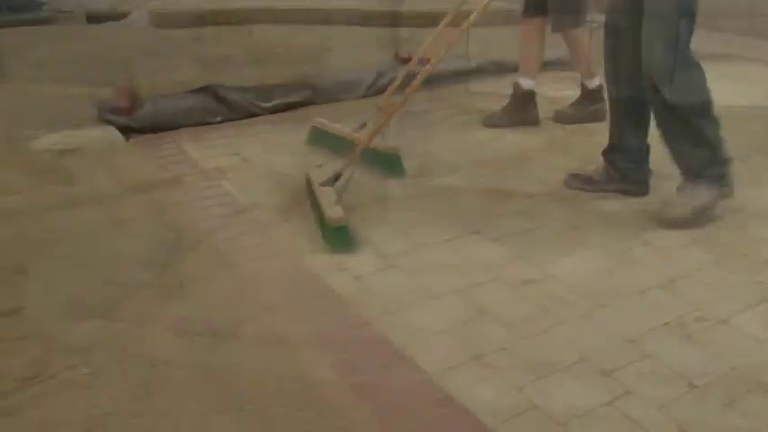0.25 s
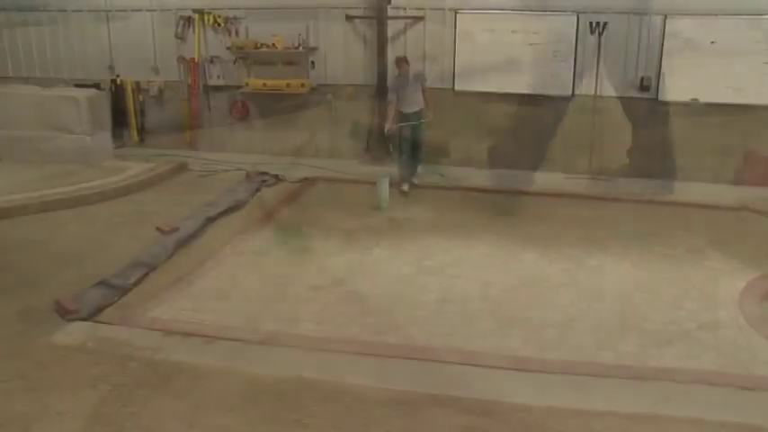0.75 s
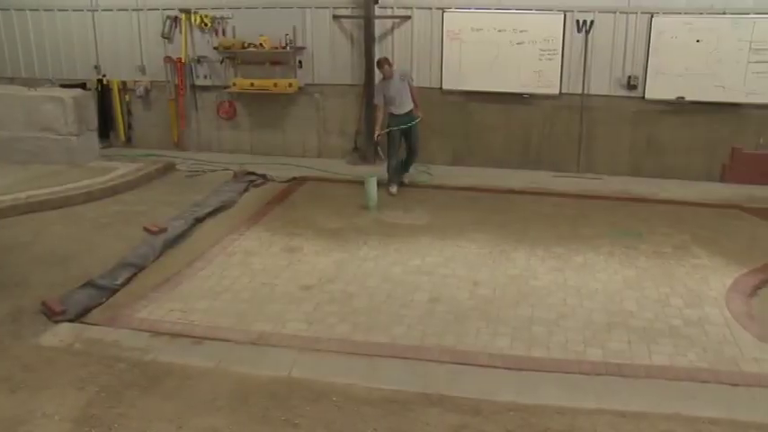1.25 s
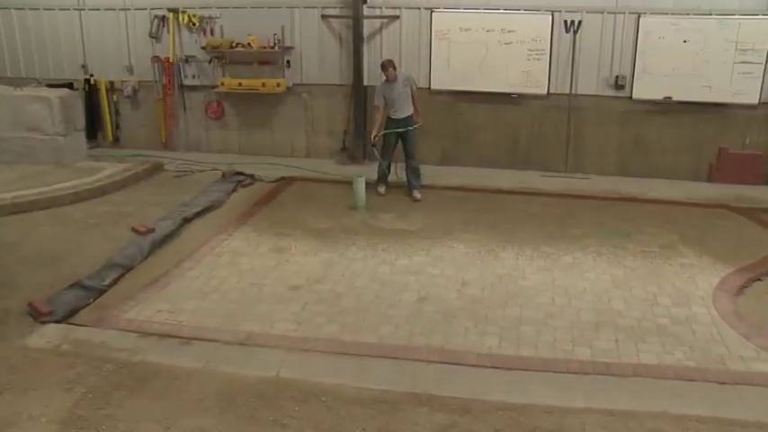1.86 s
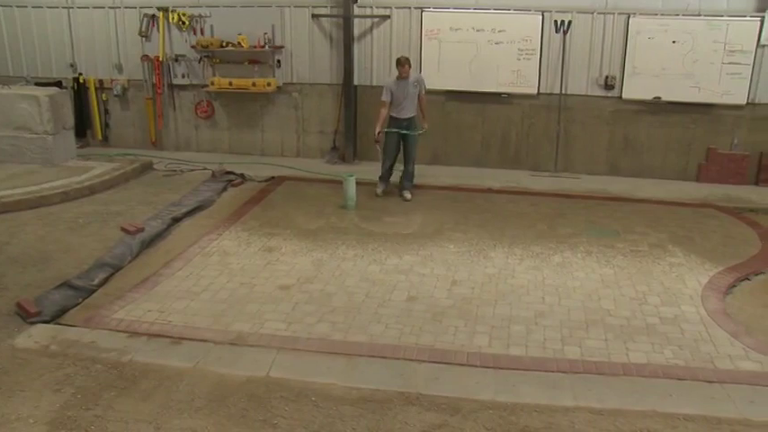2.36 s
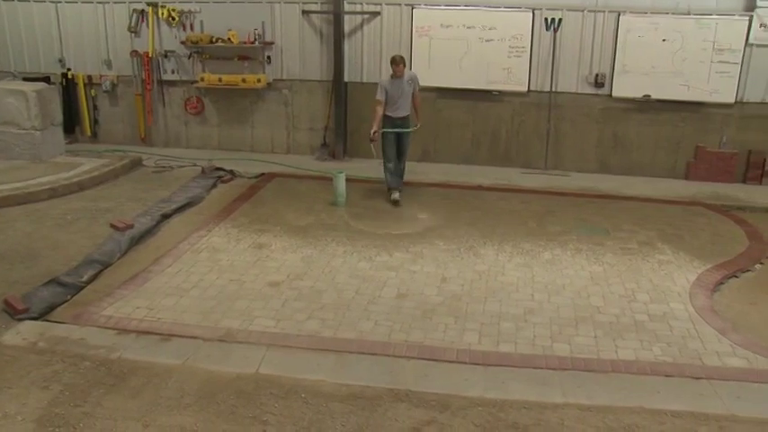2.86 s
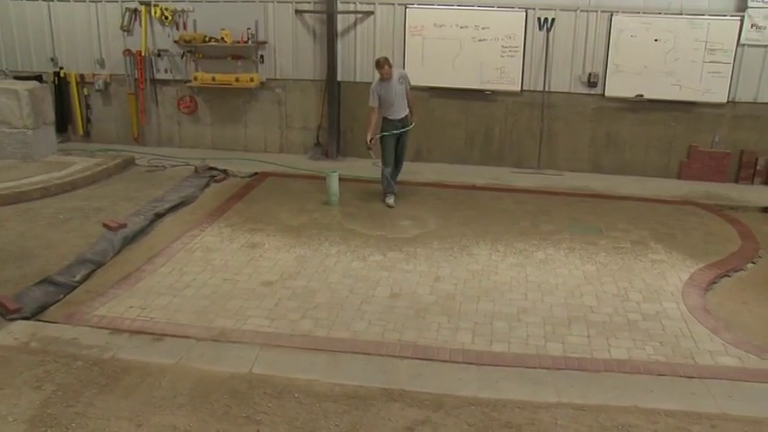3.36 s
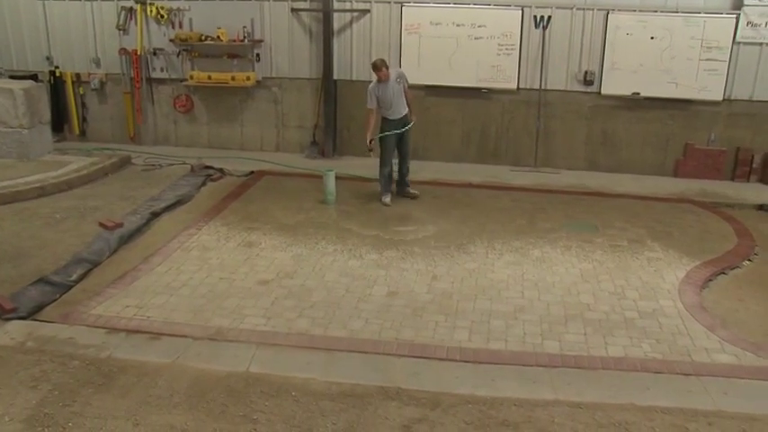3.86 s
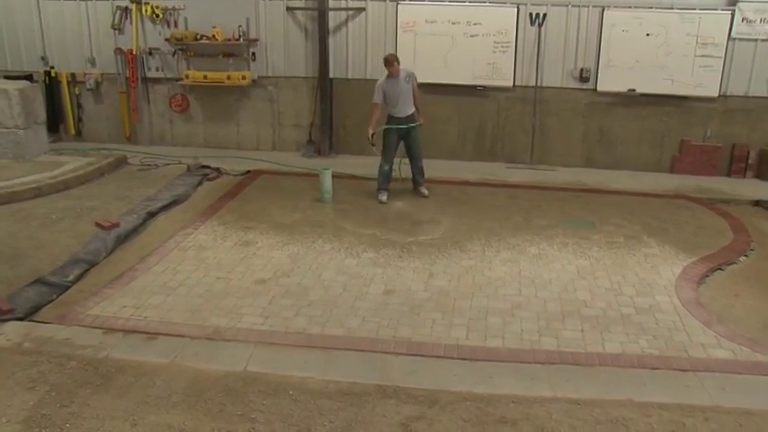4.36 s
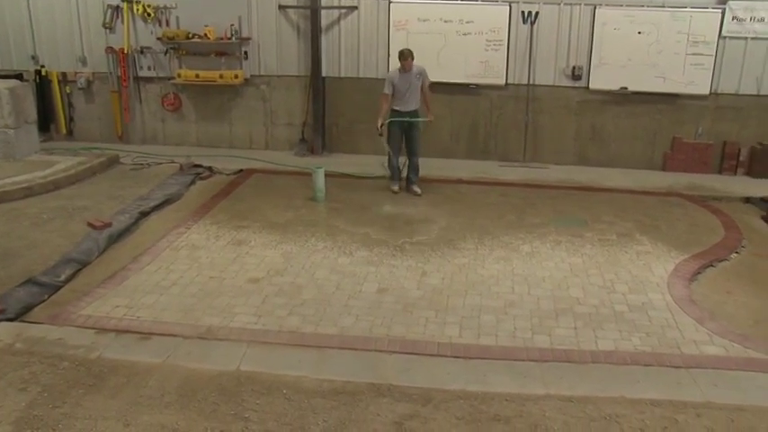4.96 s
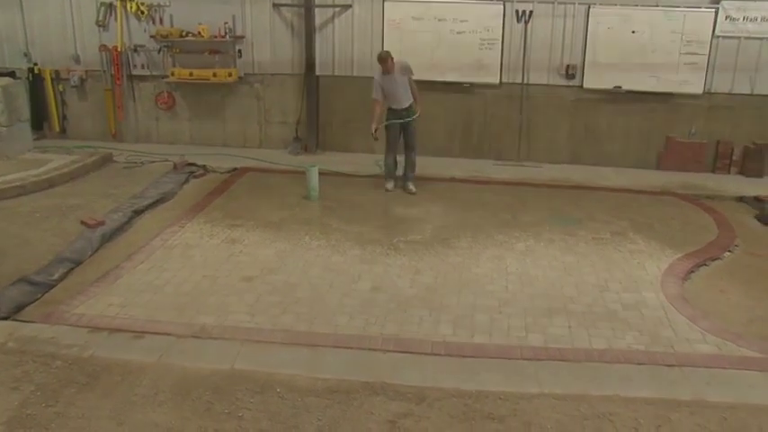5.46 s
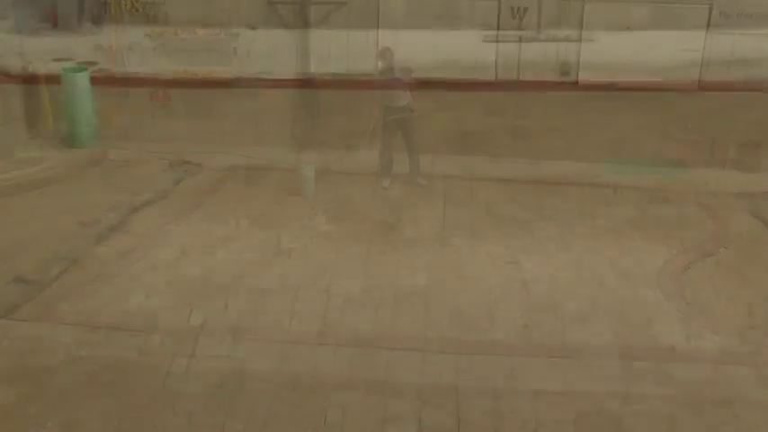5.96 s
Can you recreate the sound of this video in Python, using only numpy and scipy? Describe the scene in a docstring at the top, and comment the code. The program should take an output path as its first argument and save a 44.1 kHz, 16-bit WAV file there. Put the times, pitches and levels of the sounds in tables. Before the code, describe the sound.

Water spray hisses over sandy pavers indoors, dense and crisp like fine sizzling, fluttering with tiny lulls and a slow hollow phasing sweep. Sharp little splashes and soft pats dot it. A few muffled knocks and a bassy bump are heard through the first half; later a quick woody clatter rings briefly in the hall. Everything is centred, with faint low air rumble, rising in at first and fading out last.

```python
"""Hose spray on sanded paving

A hand-held hose patters on sanded paving in a large workshop hall. Random tiny impacts over noise
make a scratchy hiss; the swinging jet moves the comb notches of a ground echo, so its treble swirls.
Noise bursts make fat drops, damped sines wet pats, and swelling noise the scuffs of shoes. Filtered
pushes make dull knocks, a short clatter and a soft bump, over low ventilation noise.
"""
import sys
import numpy as np
from scipy import signal
from scipy.fft import rfft, irfft, next_fast_len
from scipy.io import wavfile
from scipy.ndimage import uniform_filter1d

SR = 44100
rng = np.random.default_rng(int(sys.argv[2]) if len(sys.argv) > 2 else 0)


def master_out(mix):
    """Clip the mix to full scale and print it as 16-bit PCM to the path in sys.argv[1]."""
    frames = np.transpose(np.atleast_2d(mix))
    ceiling = np.clip(frames, -1, 1)
    pcm = np.round(ceiling * 32767).astype(np.int16)
    wavfile.write(sys.argv[1], SR, pcm)


N = 273155
TOP_HZ = 15850  # upper edge of the sound


def spray(mist_db, hiss_db, splatter_db, gain_db):
    """Comb filtering: a jet's noise meets its own short ground echo, whose delay sets the notch spacing."""
    # spectrum of the patter: hz, level_db
    patter_colour = [(100, -14.5), (300, -15), (600, -10.5), (1200, -7.5), (2100, -9), (2900, -9.5),
                     (3800, -2.5), (5000, -0.5), (7000, 1.5), (9000, -2.5), (12000, -3), (14000, -6),
                     (15800, -12)]
    # aim of the spray, level of the hiss before gain: start_s, level_db
    aim = [(0.25, -23.5), (0.49, -27.5), (0.55, -23.5), (0.67, -24), (1.07, -23), (1.19, -25),
           (1.29, -24.5), (1.69, -24), (2.33, -24.5), (2.45, -23), (2.57, -27.5), (2.77, -24),
           (2.97, -24.5), (3.05, -22), (3.17, -25), (3.57, -22.5), (3.79, -25.5), (3.95, -22.5),
           (4.11, -27.5), (4.19, -23.5), (4.49, -27), (4.99, -23), (5.13, -28.5), (5.27, -24), (5.33, -28),
           (5.55, -23)]
    # fine mist, of which only the variation counts: start_s, level_db
    mist_curve = [(0.25, -27.5), (1.19, -28), (1.49, -26), (1.77, -28.5), (1.87, -26.5), (3.19, -27),
                  (3.59, -27), (3.75, -30), (3.91, -25.5), (4.09, -30), (4.25, -22.5), (4.38, -24.5),
                  (4.49, -30), (4.63, -24.5), (5.55, -28)]
    # highest treble, before its pitch weighting: start_s, level_db
    sheen_curve = [(0, 0), (1.85, -2.5), (2.0, 1), (2.5, 4), (2.65, 0), (3.15, 0), (3.3, -4), (3.8, -3),
                   (3.9, -1), (4.4, 0), (4.6, 1), (6.1, 4)]
    # the hand swings the jet to and fro, so the echo path lengthens and shortens: start_s, notch_spacing_hz
    swing_curve = [(0, 2980), (.07, 2870), (.16, 2950), (.3, 2880), (.43, 3130), (.54, 2900), (.7, 3060),
                   (.8, 2880), (.93, 3030), (1.05, 2970), (1.18, 3170), (1.33, 2970), (1.44, 3110),
                   (1.59, 2970), (1.76, 3300), (1.86, 3030), (2.0, 3330), (2.14, 2920), (2.3, 3440),
                   (2.45, 3110), (2.66, 3750), (2.78, 3320), (2.91, 3710), (3.06, 3270), (3.18, 3600),
                   (3.34, 3330), (3.47, 3540), (3.6, 3310), (3.77, 3620), (3.95, 3090), (4.13, 3720),
                   (4.21, 3470), (4.3, 3560), (4.43, 3620), (4.56, 3330), (4.72, 2960), (4.87, 3320),
                   (5.0, 3090), (5.13, 3490), (5.27, 3030), (5.42, 3560), (5.51, 2960), (5.64, 3350),
                   (5.78, 2930), (5.97, 3320), (6.13, 3040)]
    # echo strength before its pitch weighting: start_s, lower_treble_share, upper_treble_share
    echo = [(0, .54, .45), (2.1, .52, .47), (2.3, .1, .47), (2.65, .2, .45), (2.85, .42, .36),
            (3.15, .25, .3), (3.35, .55, .42), (4.0, .45, .42), (4.35, .3, .45), (4.7, .06, .47),
            (5.35, .08, .45), (5.5, .38, .48), (6.1, .28, .48)]
    # how much of the echo each pitch keeps: hz, share
    echo_shape = [(1500, 0), (3000, .4), (6000, .15), (8500, 1)]

    patter = impacts(per_s=3100, spread_db=5, range_db=16.5, decay_s=.00028, splash=.9)
    sputter = undb(0.97 * wander(80))  # quick unevenness of the jet: spread in dB, values per second
    hiss = undb(hiss_db) * rng.standard_normal(N)
    raw = colour(patter * sputter + hiss, patter_colour)
    in_hall = unit(hall(raw, t60_s=.39, wet_db=-16, rise_s=.003))
    hz, t, bins = signal.stft(in_hall, SR, nperseg=512)
    hz = hz[:, None]

    (aim_db,) = follow(aim, t)
    (top_db,) = follow(mist_curve, t)
    (sheen_db,) = follow(sheen_curve, t)
    (notch_hz,) = follow(swing_curve, t)
    lower, upper = follow(echo, t)
    swing_db = aim_db - aim_db.mean()

    # direct sound minus its echo: notches at the multiples of notch_hz
    upper_weight = slope([(10500, 0.19), (12000, 1)], hz)
    share = (lower + (upper - lower) * upper_weight) * slope(echo_shape, hz)
    comb = np.abs(1 - np.clip(share, 0, .9) * np.exp(2j * np.pi * hz / notch_hz))

    # the mist mostly keeps its own level; the low splatter is steadier than the hiss
    mist_change_db = top_db - top_db.mean() - swing_db + mist_db
    mist = mist_change_db * slope([(7500, 0.028), (10000, 0.94)], hz)
    sheen = sheen_db * slope([(12500, 0), (15000, 0.91)], hz)
    splatter = (splatter_db - 0.7 * swing_db) * slope([(2400, 0.51), (3800, 0)], hz)

    level_db = aim_db + mist + sheen + splatter + thinning(hz, t) + gain_db
    return signal.istft(bins * comb * undb(level_db), SR)[1][:N]


def impacts(per_s, spread_db, range_db, decay_s, splash):
    """Shot noise: random impacts, most faint and a few strong, each a damped ring plus a noise burst."""
    count = int(per_s * N / SR)
    when, strength, pitch, length, turn = rng.random((count, 5)).T[:, :, None]
    k = np.arange(128)
    # exponential distribution of sizes in dB, cut off at range_db
    size_db = -spread_db * np.log(1 - strength * (1 - np.exp(-range_db / spread_db)))
    ring = np.sin(2 * np.pi * (pitch * TOP_HZ * k / SR + turn))
    fade = np.exp(-k / SR / (decay_s * (.5 + length)))
    grains = undb(size_db) * fade * (ring + splash * rng.standard_normal(ring.shape))
    places = (when * N).astype(int) + k
    return unit(np.bincount(places.ravel(), grains.ravel(), N)[:N])


def thinning(hz, t):
    """Amplitude modulation by band: the hiss flutters, varies in patches and drops into abrupt lulls."""
    # momentary lulls, depths before pitch weighting: centre_s, half_length_s, low_db, high_db
    lulls = [(.025, .02, -12, -10), (.175, .012, -18, 0), (.29, .026, -38, -3), (.435, .026, -36, -3),
             (.57, .014, -16, -2), (.95, .056, -40, -9), (1.21, .045, -36, -5), (1.545, .016, -20, -6),
             (1.615, .014, -18, -4), (1.79, .014, -20, 0), (2.08, .027, -22, -17), (3.335, .052, -28, -15),
             (3.587, .018, -32, -4), (3.775, .022, -26, -1), (4.175, .018, -30, -1), (4.275, .028, -12, -8),
             (4.415, .016, -22, 0), (4.52, .02, -22, 0), (4.916, .013, -14, -16), (5.325, .025, -40, -8),
             (5.495, .012, -15, 0), (5.845, .05, -36, -10), (6.0, .018, -6, -14), (6.08, .02, -22, -12)]
    # pitches a lull takes in the low middle: hz, weight
    lull_low = [(130, .5), (260, 1), (680, 1), (900, .08), (2000, 0)]
    # pitches a lull takes in the upper middle: hz, weight
    lull_high = [(800, 0), (1500, .15), (2000, .6), (2700, 1.6), (3100, 1), (3600, .02)]
    # how much each pitch flickers on its own: hz, spread_db
    patchiness = [(200, 1.5), (500, 3), (1200, 2), (2600, 2.2), (4000, .8), (14000, 1.2)]

    low, high = slope(lull_low, hz), slope(lull_high, hz)
    flicker = np.interp(t, np.arange(N) / SR, wander(35))
    flutter_db = 2.2 * np.minimum(flicker, 0)  # dips only
    patch_db = slope(patchiness, hz) * patches((len(hz), len(t)), size=4)
    change_db = flutter_db * (low + high / 2) + patch_db
    for s, half_s, low_db, high_db in lulls:
        dip = np.exp(-((t - s) / half_s) ** 4)  # flat bottom, steep sides
        change_db = change_db + dip * (low_db * low + high_db * high)
    return change_db


def drops(decay_s, gain_db):
    """Impulsive excitation: a fat drop on stone gives a filtered noise burst that decays within milliseconds."""
    # fattest drops, mean level over 2 ms before gain: start_s, level_db
    fat_drops = [(.3229, -16), (.5664, -16), (.8928, -14.5), (1.0163, -16), (1.4778, -13.5),
                 (1.5098, -14.5), (1.7177, -16), (1.926, -16), (1.9695, -17), (2.0885, -16), (2.2605, -14),
                 (2.376, -16), (2.5181, -15.5), (2.5267, -15), (2.5965, -15), (2.759, -16), (2.8623, -15.5),
                 (3.0401, -13.5), (3.0625, -15), (3.066, -16), (3.2211, -15.5), (3.2902, -16),
                 (3.9725, -16.5), (4.0139, -14), (4.1095, -15), (4.5843, -15.5), (4.7991, -15),
                 (4.9925, -14.5), (5.089, -17), (5.202, -17), (5.2585, -14), (5.2727, -13.5), (5.292, -13),
                 (5.4401, -15.5), (5.566, -16), (5.6818, -14.5)]
    # spectrum of a splash: hz, level_db
    splash_colour = [(300, -30), (1200, -14), (2800, -12), (4000, 0), (7000, 1.5), (10000, -4), (12500, -9),
                     (15800, -19)]
    out, t = np.zeros(N), np.arange(256) / SR
    for s, db in fat_drops:
        burst = rng.standard_normal(len(t)) * np.exp(-t / decay_s)
        tick = colour(burst, splash_colour)
        level = np.sqrt(np.sum(tick ** 2) / (.002 * SR))
        add(out, s, tick * undb(db + gain_db) / level)
    return out


def pats(cycles, gain_db):
    """Heavy damping: wet sand stops a drop's vibration within a cycle or two, leaving a dull pat."""
    # drops landing in wet sand, before gain: start_s, peak_db, pitch_hz
    wet_drops = [(.816, -17, 950), (1.065, -19, 1380), (1.719, -24, 1050), (2.116, -26, 1260),
                 (2.759, -23, 1000), (3.218, -23, 1290), (3.449, -22, 1500), (3.537, -22, 1220),
                 (4.19, -24, 1280), (4.419, -23, 1150), (4.533, -21, 1200), (4.57, -23, 1300)]
    out, t = np.zeros(N), np.arange(SR // 50) / SR
    for s, db, hz in wet_drops:
        swing = np.sin(2 * np.pi * hz * t) * t * np.exp(-t * hz / cycles)
        add(out, s, undb(db + gain_db) * swing / np.abs(swing).max())
    return out


def knocks(decay_s, rattle, ring_db, gain_db):
    """Modal ringing: a push and a brief rattle drive a dull body, whose damped modes ring on."""
    # knocks, singly and in a clatter, before gain: start_s, peak_db, brightness_db, centre_hz
    strikes = [(1.646, -14.5, 3, 640), (1.666, -19, 5, 720), (2.6195, -14.5, 8, 480), (4.9398, -7, 3, 500),
               (4.947, -16, -8, 125), (4.9505, -10, 0, 500), (4.961, -8.5, 0, 500), (4.972, -13, 10, 540),
               (4.975, -11, 17, 640), (4.989, -14.5, 5, 520)]
    # spectrum of a knock centred on 500 Hz: hz, level_db
    knock_colour = [(40, -22), (115, -7), (170, -14), (270, -13), (360, 5), (500, 5.5), (620, 2.5),
                    (760, -6), (950, -10), (1500, -10), (2300, -13), (3500, -25), (8000, -42)]
    # modes of the knocked body, relative level: pitch_hz, level_db, t60_s
    modes = [(350, 0, .27), (427, -2, .25), (487, -1, .2), (568, -2, .2), (850, -13, .37), (1470, -13, .3),
             (1820, -14, .35), (1944, -11, .35), (2220, -13, .45)]
    out, t = np.zeros(N), np.arange(SR // 3) / SR
    ring = np.zeros(len(t))
    for hz, db, t60_s in modes:
        ring += undb(db) * np.sin(2 * np.pi * hz * t) * np.exp(-np.log(1000) * t / t60_s)
    for s, db, bright_db, centre_hz in strikes:
        # a softer contact moves the whole colour down
        moved_colour = [(hz * centre_hz / 500, gain) for hz, gain in knock_colour]
        thud = colour(blow(t, rattle, decay_s), moved_colour)
        knock = thud / np.abs(thud).max() + undb(ring_db) * ring
        knock = colour(knock, [(600, 0), (1400, bright_db), (2600, bright_db), (5000, 0)])
        add(out, s, knock * undb(db + gain_db) / np.abs(knock).max())
    return out


def bumps(rattle, rattle_s, lag_s):
    """Damped oscillation: a close, dry thud, then a few cycles of deep bass that die quickly."""
    # soft bump: start_s, thud_peak_db, wobble_level_db, wobble_hz, wobble_decay_s
    soft_bumps = [(1.8615, -13.5, -22, 31, .055)]
    # spectrum of the thud: hz, level_db
    thud_colour = [(50, -8), (140, 2), (230, -2), (350, 1), (520, -13), (1000, -10), (1500, -25),
                   (4000, -45)]
    out, t = np.zeros(N), np.arange(SR // 4) / SR
    for s, thud_db, wobble_db, hz, decay_s in soft_bumps:
        thud = colour(blow(t, rattle, rattle_s), thud_colour)
        wobble = np.sin(2 * np.pi * hz * t) * np.exp(-t / decay_s)
        add(out, s, -undb(thud_db) * thud / np.abs(thud).max())
        add(out, s + lag_s, undb(wobble_db) * wobble)
    return out


def blow(t, rattle, decay_s):
    """Impulse excitation: a sharp push followed by a brief rattle of decaying noise."""
    return (t == 0) + rattle * rng.standard_normal(len(t)) * np.exp(-t / decay_s)


def scuffs(grit_db, gain_db):
    """Friction noise: a sole grinds over sand, an uneven rasp that swells quickly and dies away."""
    # scuffs of shoes, strongest after half the length, before gain: start_s, length_s, level_db
    steps = [(.625, .035, -39), (.67, .04, -39), (1.65, .02, -31), (2.604, .022, -28), (2.652, .04, -31),
             (3.912, .03, -33), (3.945, .025, -33)]
    # spectrum of a scuff: hz, level_db
    scuff_colour = [(80, -4), (250, -4), (390, 1), (500, -3), (640, 0), (820, -2), (1000, -6), (1380, -4),
                    (1800, -18), (5000, -32)]
    t, pressure = np.arange(N) / SR, np.zeros(N)
    for s, length_s, db in steps:
        age = np.maximum(t - s, 0) / (length_s / 2)
        pressure += undb(db + gain_db) * age ** 2 * np.exp(2 * (1 - age))
    grit = rng.standard_normal(N) * undb(grit_db * wander(300))
    return unit(colour(grit, scuff_colour)) * pressure


def ventilation(level_db):
    """Broadband flow noise: air moving through the hall gives a steady low rumble."""
    # spectrum of the ventilation: hz, level_db
    rumble_colour = [(15, -9.5), (30, -3), (45, -2), (62, 2.5), (90, -2), (130, -11), (200, -17),
                     (330, -40.5), (1000, -62), (4000, -75)]
    return unit(colour(rng.standard_normal(N), rumble_colour)) * undb(level_db)


def hall(x, t60_s, wet_db, rise_s):
    """Reverberation: convolution with decaying noise, a diffuse tail thin in the low middle."""
    t = np.arange(SR) / SR
    tail = rng.standard_normal(SR) * np.exp(-np.log(1000) * t / t60_s) * (1 - np.exp(-t / rise_s))
    tail_colour = [(150, -3.5), (600, -7.0), (1200, -1.0), (2200, 5.0), (4000, -1.5), (10000, 6.0)]
    tail = colour(tail / np.linalg.norm(tail), tail_colour)
    return x + undb(wet_db) * signal.fftconvolve(x, tail)[:N]


def undb(db):
    """Logarithmic level: decibels to amplitude gain."""
    return 10 ** (np.asarray(db) / 20)


def unit(x):
    """Root mean square: scale a signal to rms 1."""
    return x / np.sqrt(np.mean(x ** 2))


def follow(table, t):
    """Linear interpolation: the columns of a curve at times t."""
    s, *columns = np.transpose(table)
    return [np.interp(t, s, c) for c in columns]


def slope(points, hz):
    """Logarithmic pitch scale: a (hz, value) curve read on a log-frequency axis."""
    f, value = np.transpose(points)
    return np.interp(np.log(hz + 1), np.log(f), value)


def colour(x, points):
    """Minimum-phase filtering: a causal filter with the given spectrum, built from its cepstrum."""
    size = next_fast_len(2 * len(x), True) // 2 * 2
    gain = undb(slope(points, np.fft.rfftfreq(size, 1 / SR)))
    cepstrum = irfft(np.log(gain))
    # folding the cepstrum onto positive times makes the filter causal
    cepstrum[1:size // 2] *= 2
    cepstrum[size // 2 + 1:] = 0
    return irfft(rfft(x, size) * np.exp(rfft(cepstrum)))[:len(x)]


def add(track, s, sound):
    """Superposition: mix a sound into the track at time s."""
    start = max(int(s * SR), 0)
    track[start:start + len(sound)] += sound[:N - start]


def wander(rate):
    """Low-pass randomness: random values, rate per second, smoothed to a curve with rms 1."""
    hold = int(SR / rate)
    steps = np.repeat(rng.standard_normal(N // hold + 1), hold)
    return unit(uniform_filter1d(steps, hold)[:N])


def patches(shape, size):
    """Local correlation: a random field smoothed over neighbouring pitches and moments, with rms 1."""
    field = uniform_filter1d(rng.standard_normal(shape), size, axis=0)
    return unit(uniform_filter1d(field, size, axis=1))


def scene():
    """Superposition: all sources add up and reach both channels alike."""
    ticks = drops(decay_s=.0008, gain_db=.5) + pats(cycles=.55, gain_db=0)
    jet = spray(mist_db=0.5, hiss_db=-8.0, splatter_db=0.5, gain_db=1.74)
    water = jet + hall(ticks, t60_s=0.2, wet_db=-20, rise_s=.003)
    blows = knocks(decay_s=.012, rattle=.06, ring_db=-19, gain_db=0)
    thuds = hall(blows, t60_s=0.55, wet_db=-4, rise_s=.01) + scuffs(grit_db=3, gain_db=0)
    bump = bumps(rattle=.05, rattle_s=.013, lag_s=.011)
    mid = water + thuds + bump + ventilation(level_db=-40)
    return np.array([mid, mid])


def record(dry):
    """Band limiting: the level rises at the start and sinks at the end; peaks are clipped, the top cut."""
    ceiling = .85
    # the sinking level would reach zero just after the end
    fade = np.interp(np.arange(N) / SR, [0, 0.37, 5.38, 6.292], [0.52, 1, 1, 0])
    low_pass = signal.ellip(12, .1, 95, TOP_HZ, fs=SR, output="sos")
    return signal.sosfilt(low_pass, np.clip(dry * fade, -ceiling, ceiling))


dry = scene()
out = record(dry)
master_out(out)
```